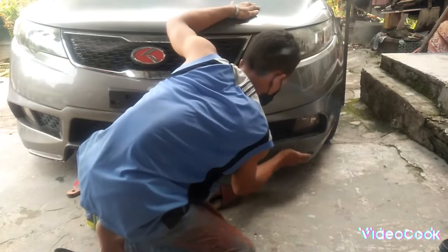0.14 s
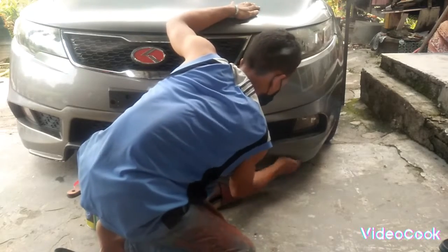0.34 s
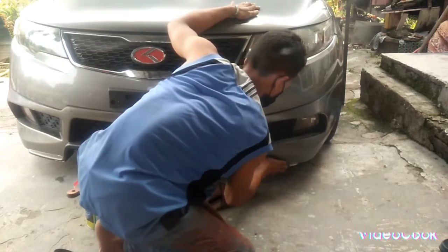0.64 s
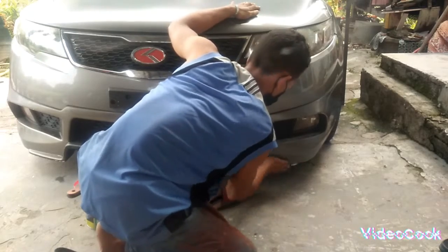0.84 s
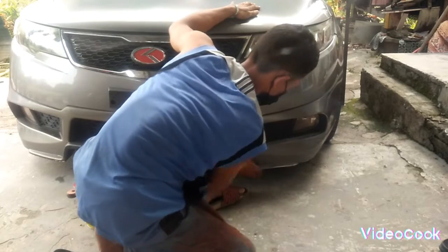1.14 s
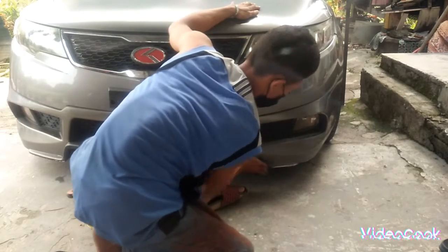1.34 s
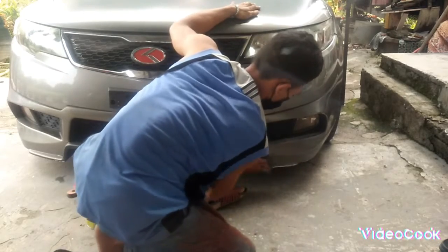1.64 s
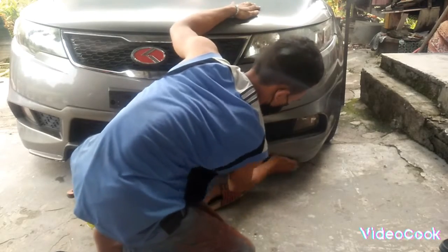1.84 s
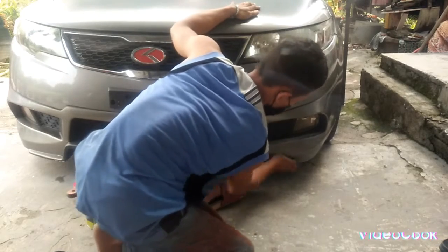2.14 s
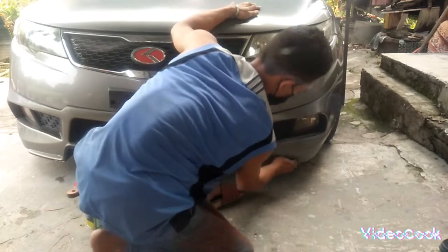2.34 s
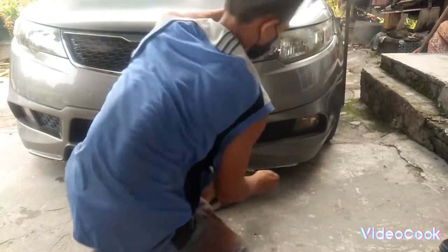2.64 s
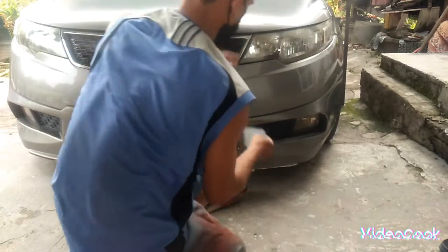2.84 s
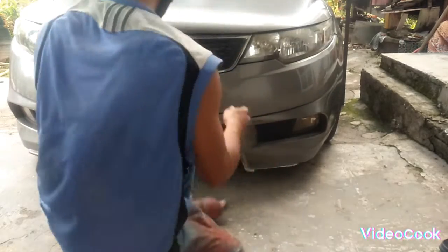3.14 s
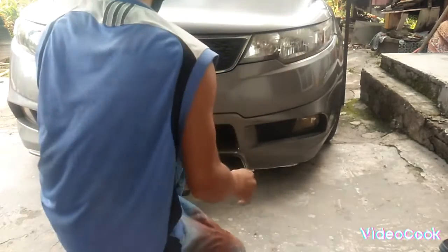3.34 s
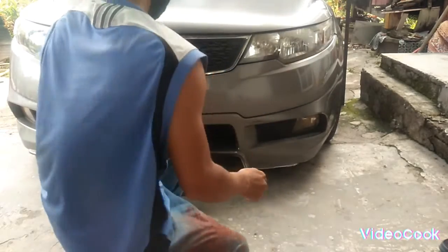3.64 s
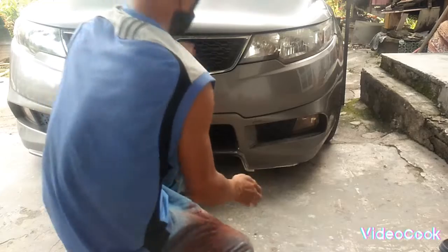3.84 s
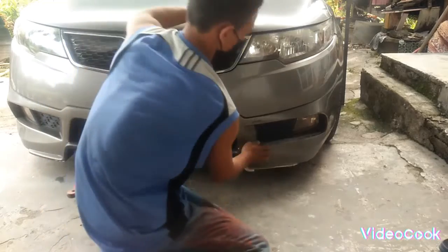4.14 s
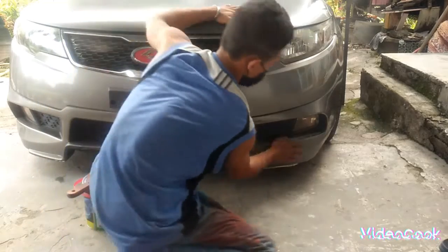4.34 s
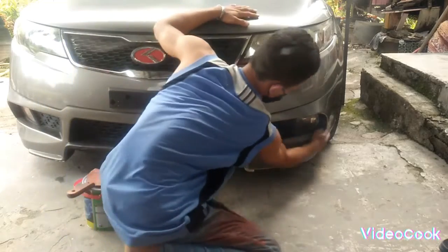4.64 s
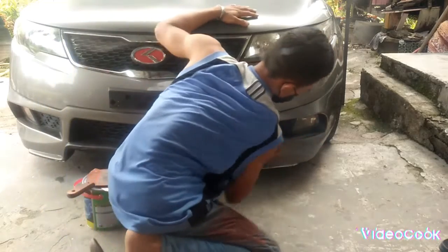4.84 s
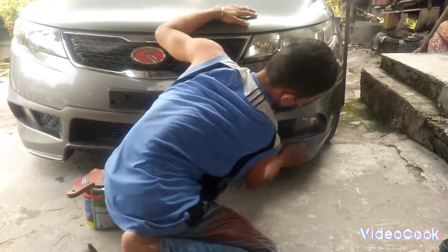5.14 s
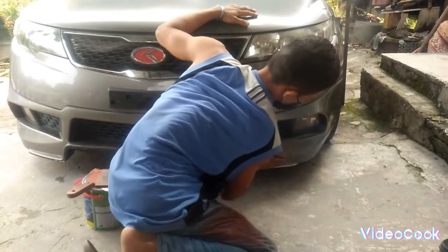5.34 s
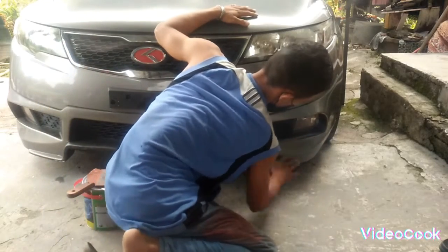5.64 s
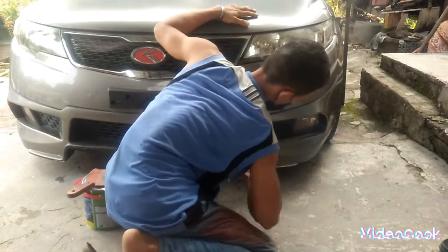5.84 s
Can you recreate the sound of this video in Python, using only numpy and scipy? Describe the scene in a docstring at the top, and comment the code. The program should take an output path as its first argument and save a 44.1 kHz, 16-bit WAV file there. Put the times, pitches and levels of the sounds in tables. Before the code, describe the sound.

Sandpaper rasps quickly back and forth over a resonant car panel, stops as the worker shifts, then resumes lightly and sparsely.

```python
"""In a concrete yard a car's plastic bumper is sanded by hand: quick hard strokes, a pause, then lighter ones.
Coloured grit noise drives the hollow panel's modes; the dragging palm adds a low rumble.
The hand knocks the panel, the paper's edge chirps, clothes rustle, and something hollow is bumped.
Dense noise tails give the yard's brief echoes; wavering sines and low noise make a faint, far motor."""
import sys
import numpy as np
from scipy import signal
from scipy.fft import rfft, irfft, next_fast_len
from scipy.io import wavfile

SR = 44100
rng = np.random.default_rng(int(sys.argv[2]) if len(sys.argv) > 2 else 0)


def to_wav(sig):
    """Store sig (one row per channel, or 1-D mono) as 16-bit WAV at the path in sys.argv[1].

    Samples outside -1..1 are clipped; the rate is SR.
    """
    pcm = np.clip(np.atleast_2d(sig), -1, 1) * 32767
    pcm = np.round(pcm).astype(np.int16)
    wavfile.write(sys.argv[1], SR, pcm.T)  # frames by channels


N = 264159
TIME_S = np.arange(N) / SR
RING_TIME_S = TIME_S[:SR // 2]

# hard strokes: (start [s], attack [s], length [s], relative scratch level [dB],
#   gain change as the hand leans in [dB], panel relative to scratch [dB])
HARD_STROKES = [(0, 0.0017, 0.072, -67, -8, 0), (.147, 0.008, .06, -58, 12, -3.5),
                (.222, 0.033, 0.021, -42.5, 5, -11), (.635, 0.054, 0.11, -41, 7, -0.5),
                (.795, 0.022, 0.078, -36, -2, -0.5), (.925, 0.12, 0.19, -36, 4, 1),
                (1.15, 0.036, 0.12, -36, 11.5, 1), (1.28, 0.027, 0.093, -40.5, -2.5, 8),
                (1.45, 0.1, 0.2, -35.5, -5.5, -1), (1.697, 0.035, 0.13, -38.5, -1.5, 1),
                (1.86, 0.059, 0.13, -35.5, -1, -4), (2.04, 0.068, 0.12, -39.5, 0, -2),
                (2.205, 0.077, 0.16, -38.5, -0.5, -6), (2.425, 0.03, 0.15, -48.5, 5, -4.5),
                (2.515, .042, 0.12, -34, 7, -8)]
# light strokes: (start [s], attack [s], length [s], relative scratch level [dB],
#   gain change as the hand leans in [dB], panel relative to scratch [dB])
LIGHT_STROKES = [(3.803, 0.017, 0.069, -65.5, 6, -1), (4.228, 0.0052, 0.1, -72.5, -1.5, -2.5),
                 (4.315, .02, .39, -48, 1, -12), (4.81, 0.11, 0.21, -51, 2.5, -16),
                 (5.19, 0.073, 0.13, -49, 5, -6), (5.37, 0.061, 0.19, -51.5, 1.5, -15),
                 (5.81, 0.064, 0.13, -56.5, 13.5, -10)]
# scratch colour, hard strokes: (frequency [Hz], relative density [dB per Hz])
HARD_SCRATCH_COLOUR = [(1060, -32.5), (1800, -8.5), (2620, 1.5), (3090, -0.5), (4230, 3.5), (4870, 3),
                       (5650, -3), (6960, -15), (7940, -15.5), (11200, -29), (13600, -29.5), (14500, -31)]
# scratch colour, light strokes: (frequency [Hz], relative density [dB per Hz])
LIGHT_SCRATCH_COLOUR = [(1060, -18.5), (1800, -23), (1950, 3), (2420, -13), (2670, 0.5), (3040, -1),
                        (4130, 6), (4870, 6.5), (6840, -12.5), (7530, -11.5), (10200, -22), (13800, -28),
                        (14500, -20)]
# broad colour of the driven panel: (frequency [Hz], relative density [dB per Hz])
PANEL_COLOUR = [(100, -33), (200, -29.5), (290, -17.5), (370, -43.5), (480, -15), (620, -4.5), (780, 0.5),
                (1050, -1), (1400, 3.5), (1900, -4), (2500, -7.5), (4000, -58)]
# bumper modes: (frequency [Hz], relative level [dB], t60 [s])
BUMPER_MODES = [(431, -15, .35), (735, 2, .17), (790, -4, .13), (924, -4, .28), (1208, -6, .28),
                (1360, -8, .16), (1492, -5, .28), (1636, -7, .18), (1902, -8, .25), (2353, -8, .18),
                (2615, -7, .18), (2764, -8, .18), (3859, -9, .15), (4653, -8, .15)]
# far motor hums: (full from [s], full until [s], frequency [Hz], level [dB])
MOTOR_HUMS = [(0, 1.338, 99.25, -66), (1.647, 3.334, 64.8, -67.5), (3.507, 5.105, 62.7, -75.5)]
# far rumble: (time [s], level [dB])
RUMBLE_LEVEL = [(0, -66), (.7, -67.5), (2.7, -68.5), (3.6, -75), (5.99, -74)]
# outdoor air noise: (frequency [Hz], relative density [dB per Hz])
AIR_COLOUR = [(15, -37.5), (25, -5), (87, -10), (189, -22), (368, -34), (432, -24.5), (594, -23),
              (679, -33.5), (985, -20.5), (1100, -32.5), (1250, -22), (1630, -40), (1870, -31.5),
              (3180, -44), (14500, -51)]
# paper-edge catches: (start [s], peak [dB], slip band centre before the treble filter [Hz], t60 [s])
EDGE_CATCHES = [(0.148, -49.5, 3470, 0.11), (0.148, -50.5, 5220, 0.51), (3.289, -71.5, 3574, 0.55),
                (4.232, -56, 3270, 0.52)]
# hand knocks, and at 3.804 s the noise of the hollow bump: (time [s], local ring peak [dB], loudest ring [Hz],
# ring width [Hz], crunch re tap [dB], scrape re ring [dB], thud re ring [dB], rebound re first landing [dB])
HAND_KNOCKS = [(0.211, -35.5, 866, 454, -15, -14, -29.5, -10),
               (0.52, -24.5, 1130, 1190, -7.5, -13, -28.5, 0),
               (1.271, -15.5, 777.4, 149, -28, -22, -50, -21), (1.707, -31, 1010, 794, -17, -6, -25.5, -12),
               (2.628, -33.5, 1087, 1100, 13, -13, -27.5, -9),
               (3.373, -35.5, 1150, 1700, 3.5, -3, -22.5, -13),
               (3.731, -61.5, 1200, 450, 11.5, -27.5, -24, -5), (3.804, -49, 920, 1380, 1, -10.5, -24, 0.5),
               (4.327, -29.5, 1122, 1360, -9.5, -4, -19.5, -4),
               (4.691, -29, 1256, 950, -22, -10.5, -22, -13.5), (5.182, -47, 900, 500, 1.5, -23, -6, -4),
               (5.272, -45.5, 1010, 900, 20, -13, -8.5, -1.5), (5.789, -55.5, 1104, 1300, 0, -17, -6, -3.5),
               (5.808, -26.5, 957, 660, -20, -19.5, -25.5, -3)]
# scrape within a knock: (frequency [Hz], relative density [dB per Hz])
SCRAPE_COLOUR = [(900, -35.5), (1900, 2), (2700, 0.5), (3400, 2.5), (4900, 1.5), (6500, -15), (9000, -22.5),
                 (14000, -30)]
# whole-bumper flexes under a firm push: (start [s], peak [dB], frequency [Hz], t60 [s])
BUMPER_FLEXES = [(4.432, -57, 68, .3), (5.800, -47, 80, .3)]
# hollow object's modes: (frequency [Hz], relative level [dB], t60 [s])
HOLLOW_MODES = [(296, 0, .14), (336, 0, .16), (440, -6, .08), (587, -1, .17), (650, -6, .1), (1109, 0, .2),
                (1297, -7, .2), (1647, -14, .2)]
# stereo width: (frequency [Hz], side filter gain [dB])
SIDE_COLOUR = [(100, -56), (3000, -70), (4500, -44), (6000, -11), (8000, -5), (12000, -5)]

# time to fall 60 dB as a stroke slows
SCRATCH_RELEASE_S, PANEL_RELEASE_S = 0.2, 0.27
MODES_DB = -7.5
HUM_FADE_S = 0.5
AIR_DB = -74
# bare contact build-up, extra for crumpling paper, delay of the second landing
BUILD_UP_S, CUSHION_S, REBOUND_S = .0018, 0.0019, 0.013
LEAD_S = .03  # swell before full contact
THUD_T60_S = .18
HOLLOW_S, HOLLOW_DB = 3.798, -39
SIDE_T60_S = .28
TOP_HZ = 14350


def undb(db):
    """Decibels to gain."""
    return 10 ** (np.asarray(db) / 20)


def unit(x):
    """Scale to rms 1."""
    return x / np.sqrt(np.mean(x ** 2))


def peak(x):
    """Scale to peak 1."""
    return x / np.max(np.abs(x))


def convolve(x, response):
    """Pass a sound through an impulse response."""
    return signal.fftconvolve(x, response)[:len(x)]


def band(x, lo_hz, hi_hz, order=2):
    """Causal band-pass."""
    edges_hz = [max(lo_hz, 20), min(hi_hz, .45 * SR)]
    return signal.sosfilt(signal.butter(order, edges_hz, "band", fs=SR, output="sos"), x)


def colour(x, points):
    """Shape a spectrum by (Hz, dB) points, interpolated over log frequency."""
    hz, db = np.transpose(points)
    size = next_fast_len(len(x) + 4096)
    bins_hz = np.maximum(np.fft.rfftfreq(size, 1 / SR), 1)
    gain = undb(np.interp(np.log(bins_hz), np.log(hz), db))
    return irfft(rfft(x, size) * gain, size)[:len(x)]


def walk(rate_hz):
    """Slow random curve of rms 1, with rate_hz knots per second."""
    knots = rng.standard_normal(4096)
    return unit(np.interp(TIME_S * rate_hz, np.arange(len(knots)), knots))


def fade(t60_s):
    """Exponential decay, 60 dB in t60_s."""
    return np.exp(-np.log(1000) * RING_TIME_S / max(t60_s, 1e-3))


def ring(modes):
    """Surface velocity after a tap: a sum of decaying modes."""
    return sum(undb(db) * fade(t60_s) * np.cos(2 * np.pi * hz * RING_TIME_S) for hz, db, t60_s in modes)


def add(out, start_s, sound):
    """Mix a sound in at a given time."""
    i = int(start_s * SR)
    out[i:i + len(sound)] += sound[:N - i]


def yard(t60_s, treble_t60_s, build_s):
    """Dense echoes from car body, ground and walls: noise that builds up, then decays; energy 1."""
    noise = rng.standard_normal(len(RING_TIME_S))
    low = band(noise, 30, 1700)
    build = 1 - np.exp(-(RING_TIME_S / build_s) ** 2)
    tail = (low * fade(t60_s) + (noise - low) * fade(treble_t60_s)) * build
    return tail / np.linalg.norm(tail)


def grit(spread_db, chatter_db, patchy_db, patch_rate_hz):
    """Countless grains snag and let go; grip flutters and colour shifts as the hand moves over the panel."""
    snag_db = spread_db * np.minimum(rng.exponential(size=N), 4)
    snags = rng.standard_normal(N) * undb(snag_db + chatter_db * walk(130))
    size = next_fast_len(N)
    spectrum = rfft(snags, size)
    # overlapping third-octave bands, each with its own random level
    third = 3 * np.log2(np.clip(np.fft.rfftfreq(size, 1 / SR), 500, 16000) / 500)
    out = np.zeros(N)
    for k in range(16):
        patch = irfft(spectrum * np.maximum(1 - abs(third - k), 0), size)[:N]
        out += patch * undb(patchy_db * walk(patch_rate_hz))
    return unit(out)


def follow(strokes, uneven_db=0.29):
    """Scratch and panel gains: strokes speed up, hold while the hand leans in or eases off, then die away."""
    scratch_power, panel_power = np.zeros(N), np.zeros(N)
    for start_s, attack_s, length_s, db, lean_db, panel_db in strokes:
        t = TIME_S - start_s
        speed = np.sin(np.pi / 2 * np.clip(t / max(attack_s, 1e-3), 0, 1))
        gain = speed * undb(db + lean_db * (np.clip(t / length_s, 0, 1) - .5))
        slowing = np.log(1000) * np.maximum(t - length_s, 0)
        scratch_power += (gain * np.exp(-slowing / SCRATCH_RELEASE_S)) ** 2
        panel_power += (gain * undb(panel_db) * np.exp(-slowing / PANEL_RELEASE_S)) ** 2
    pressure = undb(uneven_db * walk(35))
    return pressure * np.sqrt(scratch_power), pressure * np.sqrt(panel_power)


def sanding(strokes, spectrum, grains, echoes, scratch_db, panel_db, fine_db, direct_db, echo_db,
            fine_growth=0.57):
    """Grit hisses at the contact and drives the panel, whose modes colour every stroke."""
    scratch_gain, panel_gain = follow(strokes)
    scratch = unit(colour(grains, spectrum)) * scratch_gain
    # the finest hiss grows more slowly with pressure, so a light touch is brighter
    fine = unit(band(grains, 5700, 16000)) * scratch_gain ** fine_growth
    modes = ring(BUMPER_MODES)
    ringing = convolve(grains * panel_gain, modes / np.linalg.norm(modes))
    panel = unit(colour(grains, PANEL_COLOUR)) * panel_gain + undb(MODES_DB) * ringing
    direct = undb(scratch_db) * scratch + undb(panel_db) * panel + undb(fine_db) * fine
    return undb(direct_db) * direct + undb(echo_db) * convolve(direct, echoes)


def drag(strokes, db, growth=0.56, judder_db=3):
    """The dragging palm judders the panel: a low rumble that grows slowly with pressure."""
    _, panel_gain = follow(strokes)
    judder = band(rng.standard_normal(N), 150, 290, order=3) * undb(judder_db * walk(40))
    return undb(db) * panel_gain ** growth * unit(judder)


def background(waver=0.019):
    """A far motor hums as wavering sines and rumbles as low noise, under soft outdoor noise."""
    hum = np.zeros(N)
    for start_s, end_s, hz, db in MOTOR_HUMS:
        # fades lie outside start and end
        running = np.clip(1 + np.minimum(TIME_S - start_s, end_s - TIME_S) / HUM_FADE_S, 0, 1) ** 2
        phase = 2 * np.pi * np.cumsum(hz * (1 + waver * walk(17))) / SR
        hum += undb(db) * running * unit(np.sin(phase) * undb(2 * walk(9.7)))
    rumble_db = np.interp(TIME_S, *np.transpose(RUMBLE_LEVEL))
    rumble = unit(band(rng.standard_normal(N), 44, 115)) * undb(rumble_db)
    air = unit(colour(band(rng.standard_normal(N), 37, 18000), AIR_COLOUR))
    return hum + rumble + air * undb(AIR_DB + 1.2 * walk(5.9))


def burst(rise_s, t60_s):
    """Envelope of a padded contact that builds up and dies away."""
    return (1 - np.exp(-(RING_TIME_S / max(rise_s, 1e-4)) ** 2)) * fade(t60_s)


def catches(width_hz=260):
    """The paper's edge slips briefly: narrow-band noise, filtered to a thin treble chirp."""
    out = np.zeros(N)
    for s, db, hz, t60_s in EDGE_CATCHES:
        noise = rng.standard_normal(len(RING_TIME_S))
        slip = band(noise, hz - width_hz / 2, hz + width_hz / 2, order=1)
        add(out, s, undb(db) * peak(band(slip, 4300, 8400) * burst(0.0052, t60_s)))
    return out


def contact(rise_s, t60_s):
    """Noise of paper and palm: it swells until full contact at LEAD_S, then dies away."""
    t = RING_TIME_S - LEAD_S
    log_gain = np.minimum(t / max(rise_s, 1e-4), -np.log(1000) * t / max(t60_s, 1e-3))
    return rng.standard_normal(len(t)) * np.exp(log_gain)


def blow(rise_s, crunch_db, t60_s):
    """Force of a landing hand: crumpling paper around one firm tap."""
    tap = signal.unit_impulse(len(RING_TIME_S), int(LEAD_S * SR))
    return undb(crunch_db) * contact(rise_s, t60_s) + tap


def knocks(echoes, modes_db=-20, crunch_t60_s=0.017, scrape_t60_s=0.082, echo_db=0.0):
    """The hand lands and rebounds: damped local ring, bumper modes, grit scrape, thud; firm pushes flex it."""
    out = np.zeros(N)
    for s, db, hz, width_hz, crunch_db, scrape_db, thud_db, rebound_db in HAND_KNOCKS:
        # band edges whose geometric centre is hz
        lo_hz = np.hypot(hz, width_hz / 2) - width_hz / 2
        rise_s = BUILD_UP_S + CUSHION_S * undb(crunch_db)
        for landing_s, landing_db in (s, db), (s + REBOUND_S, db + rebound_db):
            force = blow(rise_s, crunch_db, crunch_t60_s)
            local = peak(band(band(force, lo_hz, lo_hz + width_hz), 450, 2600))
            body = peak(convolve(local, ring(BUMPER_MODES)))
            scrape = peak(colour(contact(rise_s, scrape_t60_s), SCRAPE_COLOUR))
            thud = peak(band(contact(2 * rise_s, THUD_T60_S), 140, 320, order=3))
            hit = local + undb(scrape_db) * scrape + undb(thud_db) * thud
            knock = hit + undb(modes_db) * body + undb(echo_db) * convolve(hit, echoes)
            add(out, landing_s - LEAD_S, undb(landing_db) * knock)
    for s, db, hz, t60_s in BUMPER_FLEXES:
        add(out, s, undb(db) * peak(np.sin(2 * np.pi * hz * RING_TIME_S) * burst(0.017, t60_s)))
    return out


def rustle(start_s=2.91, end_s=4.25, db=-78.5, uneven_db=4):
    """Clothes rub faintly as the worker sits back and leans in again: uneven band noise."""
    moving = np.interp(TIME_S, [start_s, start_s + 0.38, end_s - .1, end_s], [0, 1, 1, 0])
    rubbing = band(rng.standard_normal(N), 760, 1590) * undb(uneven_db * walk(21.9))
    return undb(db) * moving * unit(rubbing)


def hollow_knock(echoes, echo_db=-8):
    """Something hollow is bumped softly as the light strokes begin; the padded tap rings its modes."""
    force = band(blow(rise_s=.005, crunch_db=-27, t60_s=.03), 220, 2000)
    out, hit = np.zeros(N), peak(convolve(force, ring(HOLLOW_MODES)))
    add(out, HOLLOW_S - LEAD_S, undb(HOLLOW_DB) * (hit + undb(echo_db) * convolve(hit, echoes)))
    return out


def scene():
    """All sources sit in the middle; a diffuse side signal, mostly treble, spreads left and right."""
    echoes = yard(t60_s=0.31, treble_t60_s=0.29, build_s=0.0017)
    hard_grit = grit(spread_db=0.1, chatter_db=1.0, patchy_db=2.5, patch_rate_hz=45)
    hard = sanding(HARD_STROKES, HARD_SCRATCH_COLOUR, hard_grit, echoes,
                   scratch_db=-1.5, panel_db=-4.5, fine_db=-46.5, direct_db=-1.5, echo_db=-14.5)
    light_grit = grit(spread_db=1.7, chatter_db=1, patchy_db=2.5, patch_rate_hz=43)
    light = sanding(LIGHT_STROKES, LIGHT_SCRATCH_COLOUR, light_grit, echoes,
                    scratch_db=-2.5, panel_db=-1.5, fine_db=-39.5, direct_db=-1.2, echo_db=-12.0)
    palm = drag(HARD_STROKES, db=-52) + drag(LIGHT_STROKES, db=-41.5)
    mid = hard + light + palm + background() + catches() + knocks(echoes) + rustle() + hollow_knock(echoes)
    diffuse = convolve(mid, yard(t60_s=SIDE_T60_S, treble_t60_s=SIDE_T60_S, build_s=.001))
    side = colour(diffuse, SIDE_COLOUR)
    return np.array([mid + side, mid - side])


def record(dry):
    """Steep elliptic low-pass cuts the top."""
    return signal.sosfilt(signal.ellip(10, .2, 70, TOP_HZ, fs=SR, output="sos"), dry)


dry = scene()
out = record(dry)
to_wav(out)
```